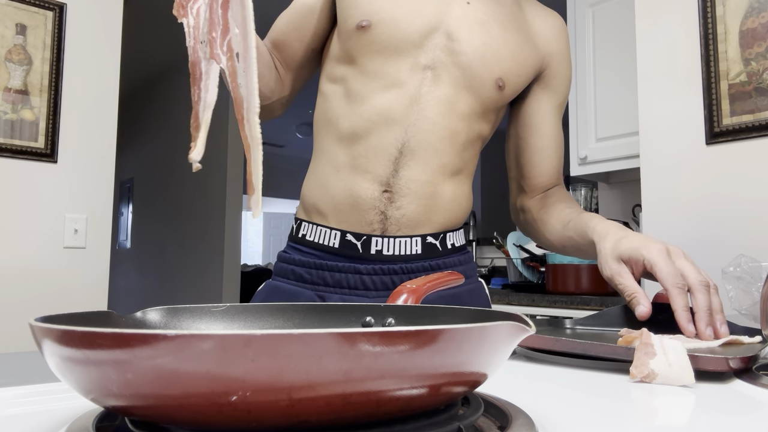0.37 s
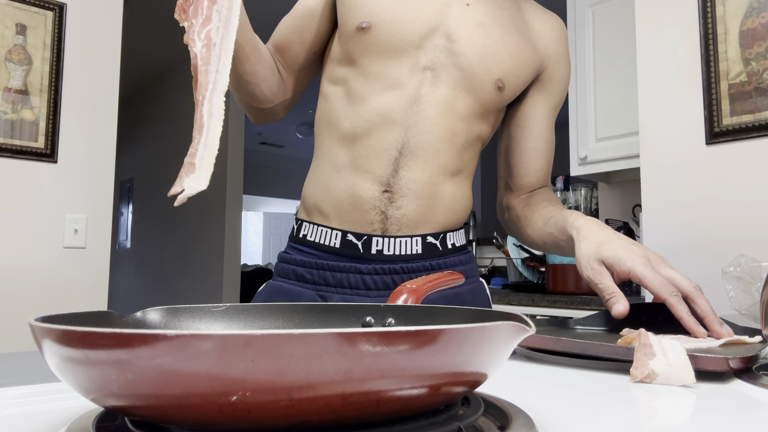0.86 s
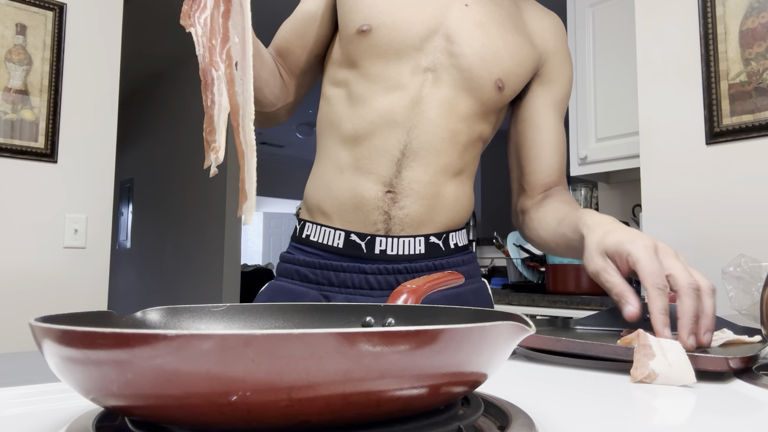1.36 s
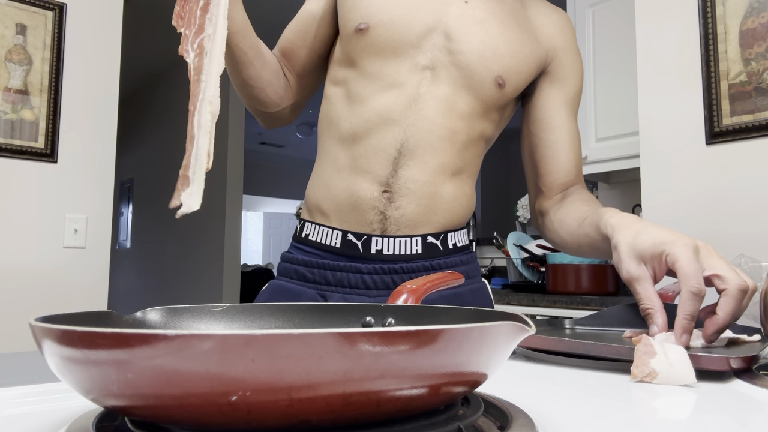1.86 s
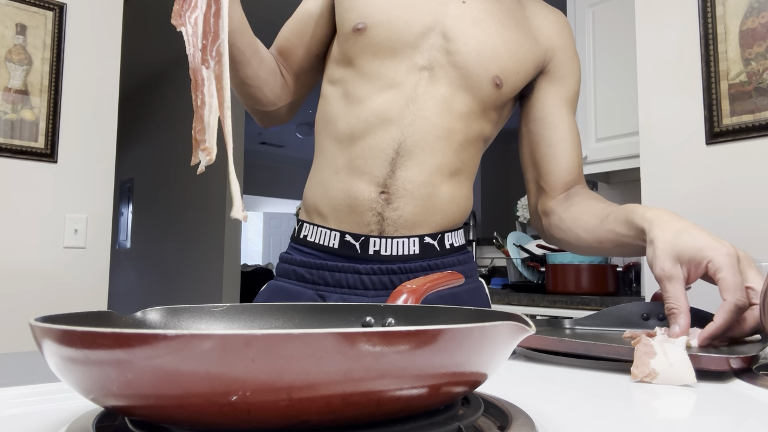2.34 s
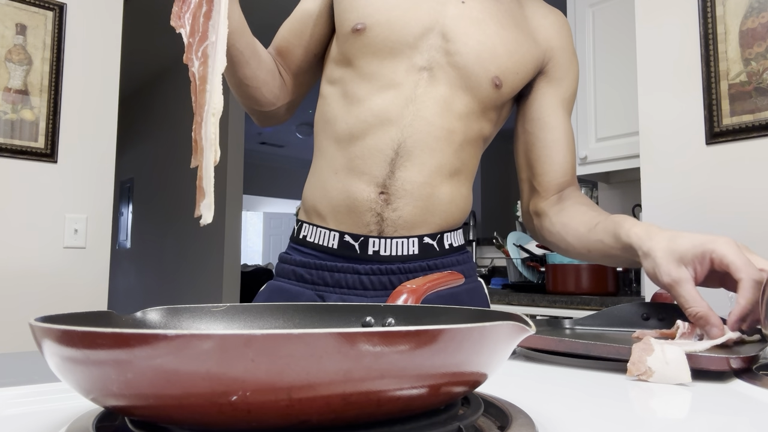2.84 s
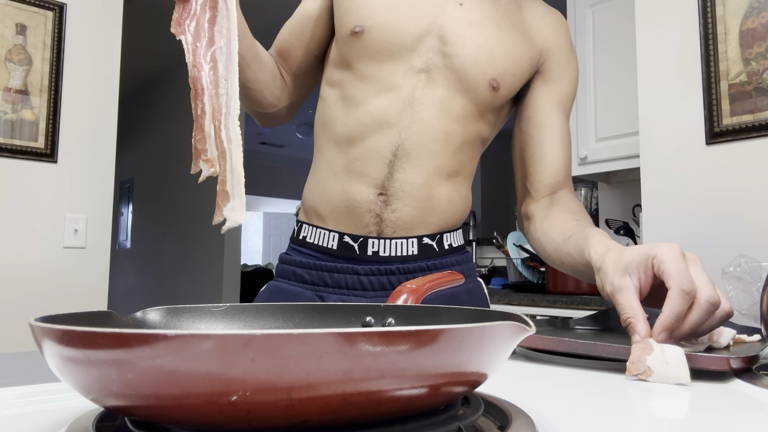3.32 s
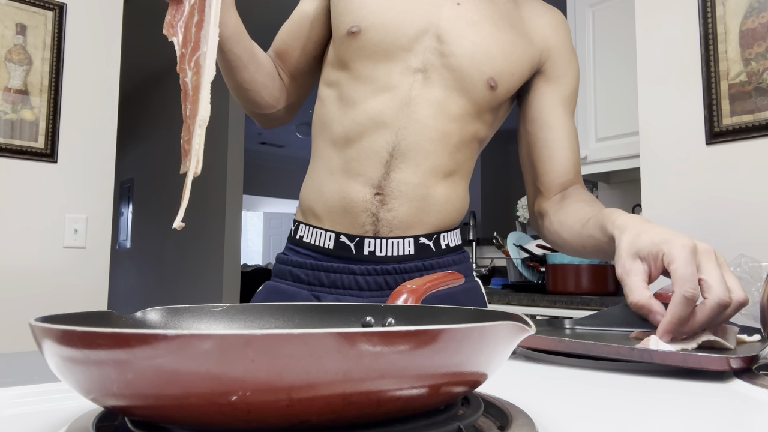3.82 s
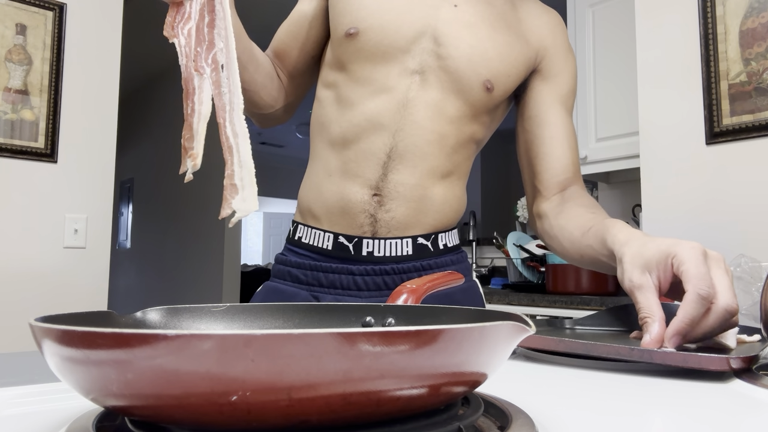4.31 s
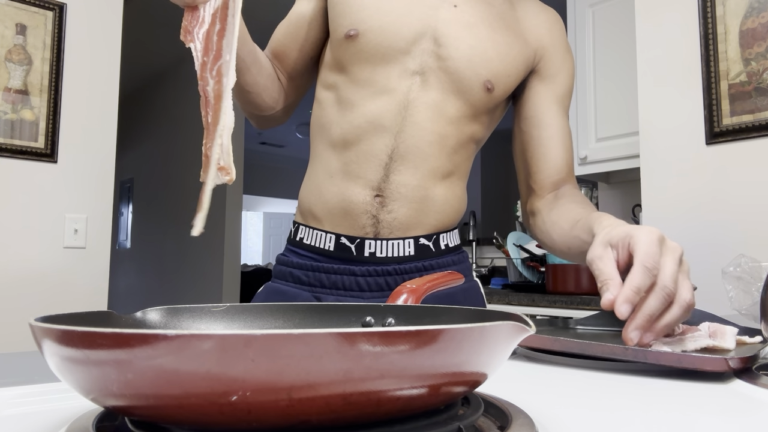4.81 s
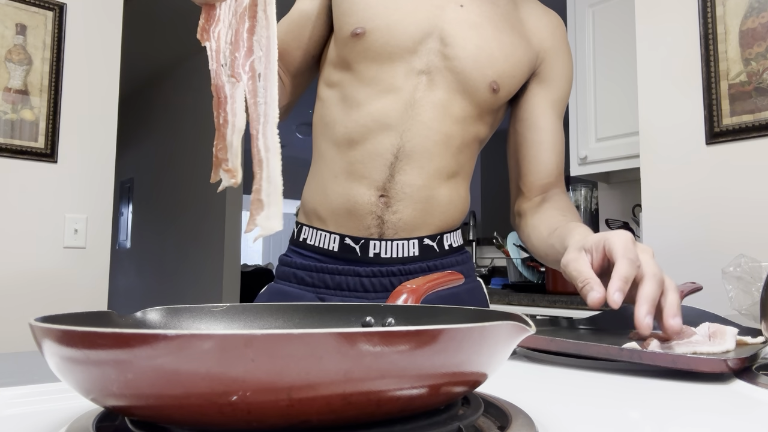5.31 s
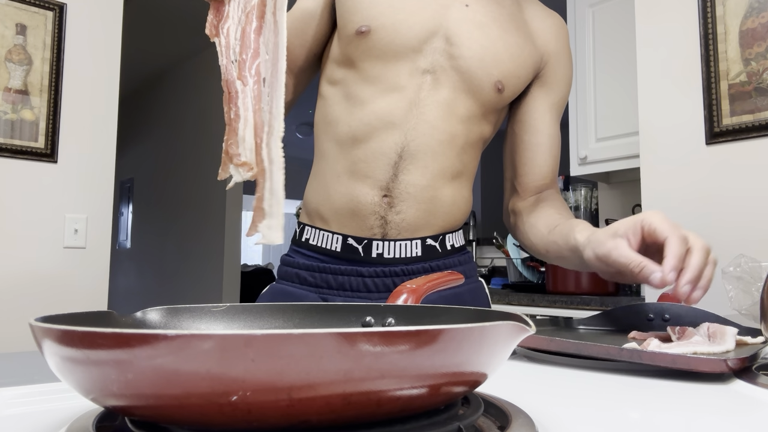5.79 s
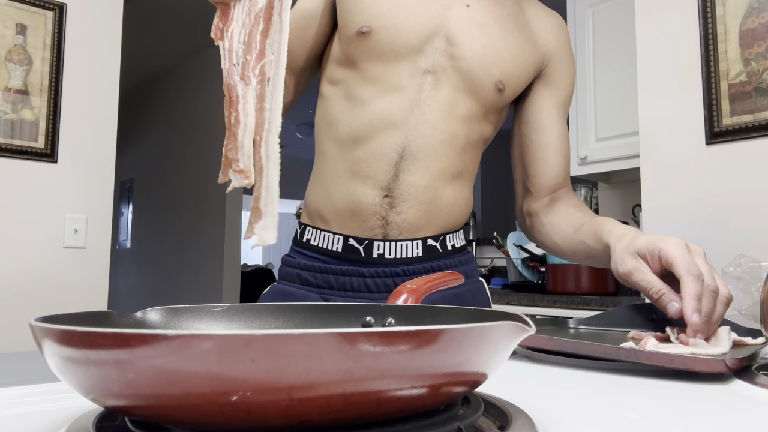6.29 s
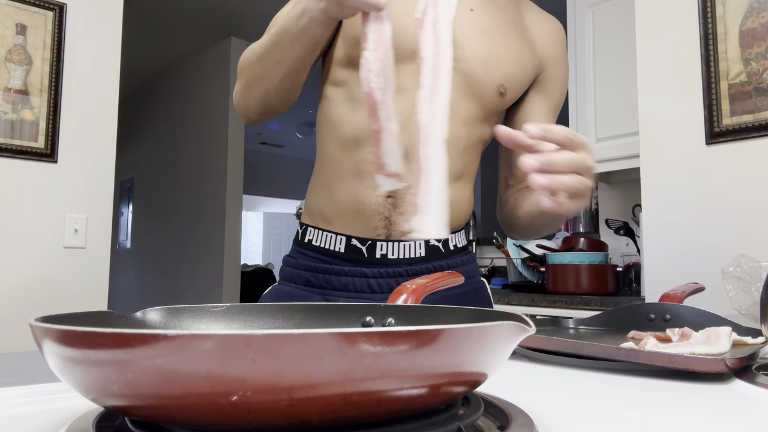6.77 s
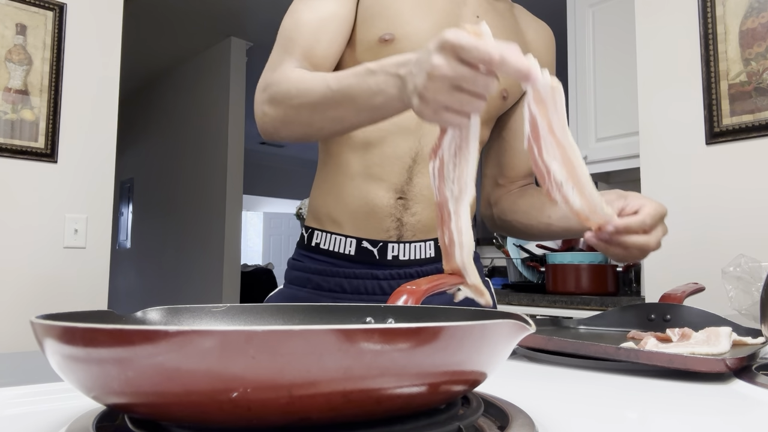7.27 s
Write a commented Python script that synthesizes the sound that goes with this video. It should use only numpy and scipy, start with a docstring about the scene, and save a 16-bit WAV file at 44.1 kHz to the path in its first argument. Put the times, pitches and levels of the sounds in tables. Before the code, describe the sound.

Throughout about 7.5 seconds, a home kitchen is filled by a steady low drone near 59 hertz, wavering motor tones above it, a broad fan roar coloured by the room and a duller, quiet hiss. During the first four seconds only three very faint ticks occur, around 0.2, 0.7 and 1.4, with tiny sticky peels of raw bacon near 1.7 and 3.15. At 4.1 the heating coil under the pan breaks into a dense run of small dry metallic ticks, about twenty per second. A loud snap rings through the pan at 5.0, close to a faint peel at 5.1; further snaps come at 5.4 and 5.95, with ticks between them. Ticking grows sparser after 6. A light fingertip tap on a tray falls at 6.25, soft peels follow at 6.3 and 6.6, and a last snap comes at 7.2. The microphone is close, in stereo, with brief room reflections.

```python
"""Kitchen with fan, stove coil and bacon

An extractor fan and a compressor fill the room: air rush is shaped noise, motor hum is wavering sines.
A stove coil heats under a pan: the metal creeps in runs of small ticks and lets go in louder snaps.
Each is a burst of noise, heard directly and through the ringing modes of coil and pan.
Fingers peel sticky bacon strips beside it as swells of grainy bright noise, with a tap on the tray."""
import sys
import numpy as np
from scipy import signal
from scipy.fft import rfft, irfft, next_fast_len
from scipy.io import wavfile
from scipy.ndimage import uniform_filter1d, map_coordinates

SR = 44100
rng = np.random.default_rng(int(sys.argv[2]) if len(sys.argv) > 2 else 0)


def generate_wav(signal):
    """Clip the signal to [-1, 1] and save it as 16-bit WAV at the path in sys.argv[1]."""
    frames = np.transpose(np.atleast_2d(signal))
    scaled = np.clip(frames, -1, 1) * 32767
    pcm = np.round(scaled).astype(np.int16)
    wavfile.write(sys.argv[1], SR, pcm)


def rack_gain(trim_db):
    """Turn a fader trim in dB into the linear factor to multiply a signal by."""
    fader = np.asarray(trim_db, float)
    return 10 ** (fader / 20)


N = 336924  # length [samples]
HALVES = np.array([[0.5], [-0.5]])  # splits a left-right difference between the two channels


def unit(x):
    """Scaled to rms 1."""
    return x / np.sqrt(np.mean(x ** 2) + 1e-20)


def along(points, hz):
    """Each column after the first, read at hz on a log axis."""
    f, *columns = np.transpose(points)
    return [np.interp(np.log(hz + 1), np.log(f + 1), column) for column in columns]


def wobble(rate):
    """A smooth random curve, rate knots a second."""
    knots = rng.standard_normal(int(N * rate / SR) + 4)
    return map_coordinates(knots, [np.arange(N) * rate / SR])


def filtered(x, response):
    """x times a complex response of frequency."""
    n = x.shape[-1]
    m = next_fast_len(n + 8192)
    return irfft(rfft(x, m) * response(np.fft.rfftfreq(m, 1 / SR)), m)[..., :n]


# Standing waves at the microphone lift or cancel the air noise:
# (centre [Hz], width [Hz], mid lift [dB], side lift [dB])
STANDING_WAVES = [(180, 10, 4.5, 7), (488, 10.3, 7.5, 3), (532, 8.7, -5.5, -3), (644, 12, -0.5, -5.5),
                  (673.4, 14, 5.5, -0.5), (700, 13, -0.5, -2), (788, 3.6, 0.5, -1), (842, 11, -8.5, -3),
                  (944, 18, 4, 0.5), (1050, 20, 4, -2), (1656, 50, 3.5, -1)]


def standing(hz, ripple_db):
    """Gains of mid and side: the strong low modes, and a dense uneven ripple of higher ones."""
    centre, width, *lift_db = np.transpose(STANDING_WAVES)
    bumps = np.exp(-((hz[:, None] - centre) / width) ** 2)
    ripple = [map_coordinates(rng.standard_normal(800), [hz / 35]) for _ in lift_db]
    ripple_share = np.clip(hz / 1000 - 0.5, 0, 1)  # none below 500 Hz, full from 1500 Hz
    return rack_gain(np.array(lift_db) @ bumps.T + ripple_db * np.array(ripple) * ripple_share)


def air(table, inside, patchy_db):
    """Stereo noise: the side signal is partly the mid signal turned in phase, partly its own."""
    z = signal.stft(rng.standard_normal((2, N)), nperseg=512)[2]
    # smoothed random patches in frequency and time make the noise uneven
    patches = uniform_filter1d(rng.standard_normal(z.shape[1:]), 6, axis=0)
    patches = uniform_filter1d(patches, 12, axis=1)
    noise = signal.istft(z * rack_gain(patchy_db * unit(patches)), nperseg=512)[1][:, :N]
    a, b = np.sqrt(SR / 2) * unit(noise)  # 0 dB per Hz

    def paths(hz):
        mid_db, side_db, in_step, quarter_turn = along(table, hz)
        own = np.sqrt(np.clip(1 - in_step ** 2 - quarter_turn ** 2, 0, 1))
        side = rack_gain(side_db)
        gains = np.array([rack_gain(mid_db), side * (in_step + 1j * quarter_turn), side * own])
        return inside(hz) * standing(hz, ripple_db=2.0)[[0, 1, 1]] * gains

    mid, linked, own = filtered(np.array([a, a, b]), paths)
    return np.array([mid + linked + own, mid - linked - own])


# Basic colour of the low roar and of the hiss above it, before standing waves and the trims in fan():
# (frequency [Hz], mid level [dB per Hz], side level [dB per Hz],
#  part of side in step with mid [-1 to 1], part a quarter turn ahead [-1 to 1])
ROAR_SPECTRUM = [(30, -85, -94, 0.0, -0.1), (45, -74.5, -86.5, -0.3, 0.2), (75, -69.5, -77, -0.4, -0.4),
                 (114.5, -63.5, -73.5, -0.6, -0.1), (122, -67.5, -70.5, -0.6, -0.2),
                 (178, -68.5, -82.5, -0.2, -0.3), (207, -67.5, -68.5, -0.3, -0.5),
                 (253, -57, -67, -0.6, -0.1), (282, -62, -65, -0.2, -0.9), (348, -65.5, -67, -0.5, -0.5),
                 (370, -71, -86, -0.0, -0.3), (475, -71.5, -66.5, -0.29, -0.5),
                 (563, -70.5, -62.5, -0.2, -0.4), (573, -67.5, -62, -0.86, -0.4),
                 (623, -77, -70.5, -0.6, -0.0), (704, -78, -73, -0.4, -0.5),
                 (790, -74.5, -67.5, -0.5, -0.0), (864, -78.5, -77, -0.63, -0.2),
                 (899, -75.5, -80.5, -0.2, -0.5), (1047, -89.5, -78, -0.2, -0.2)]
HISS_SPECTRUM = [(1300, -85, -89.5, -.3, .1), (1650, -89, -79.5, -.15, .4), (1930, -85.5, -87.5, -.1, .3),
                 (2600, -89, -90.5, -0.72, -.2), (3020, -90.5, -90.5, -0.78, 0),
                 (3340, -94, -94.5, -0.66, 0), (3970, -101, -101, -0.11, 0), (6270, -109, -110, -0.3, 0),
                 (9300, -117, -121, 0.094, -.5), (10250, -125, -135, 0.089, 0), (12500, -133, -137, 0, 0),
                 (15500, -140, -140, 0, 0)]


def fan():
    """Turbulent air: a low roar coloured by the room and a duller hiss above it."""
    roar = air(ROAR_SPECTRUM, lambda hz: 1 / (1 + (hz / 1150) ** 12), patchy_db=1.03)
    hiss = air(HISS_SPECTRUM, lambda hz: 1 / (1 + (1000 / (hz + 1)) ** 12), patchy_db=0.71)
    return rack_gain(0.5) * roar + rack_gain(-1.5) * hiss


# Slower shafts beat against the lowest motor tone:
# (time per beat [s], time when in step [s], rms level [dB], left-right [dB], left leads [radians])
SHAFT_BEATS = [(4.83, 4.09, -46, 2.5, 0.1), (0.3746, 3.905, -58.7, -3, -0.5)]
# Motor, blade and mains tones, all 1.52 dB stronger once played:
# (frequency [Hz], left rms level [dB], right rms level [dB], right leads [radians])
MOTOR_TONES = [(110.4, -54, -51, -0.2), (141.0, -40, -38, 0.1), (229.0, -52, -51, -0.4),
               (240.0, -47, -42, -0.6), (282.1, -48, -49, 1.2), (296.0, -55, -52, 1.2),
               (359.5, -52, -51, 0.6), (422.9, -64, -55, -1.8), (479.2, -65, -59, 3.0),
               (507.6, -58, -51, 1.6), (535.8, -45, -45, -3.1), (599.4, -58, -54, 2.4),
               (655.8, -63, -57, -2.9), (719.7, -64, -60, 2.7), (839.9, -68, -68, -2.8)]


def motors():
    """Turning machines hum as sines that waver in phase; the tones above the drone swell too, high ones more."""
    drone_hz, drone_db, drone_pan_db, drone_lead = 59.075, -38.3, -0.4, 0.32  # left-right dB; left leads, radians
    t = np.arange(N) / SR
    drone_phase = 2 * np.pi * drone_hz * t + 0.03 * wobble(1.7)
    drone_level = np.sqrt(2) * rack_gain(drone_db + drone_pan_db * HALVES)
    out = drone_level * np.sin(drone_phase + drone_lead * HALVES)
    for beat_s, step_s, db, pan_db, lead in SHAFT_BEATS:
        phase = drone_phase - 2 * np.pi * (t - step_s) / beat_s
        out += np.sqrt(2) * rack_gain(db + pan_db * HALVES) * np.sin(phase + lead * HALVES)
    for hz, left_db, right_db, lead in MOTOR_TONES:
        phase = 2 * np.pi * hz * t + 0.0012 * hz * wobble(2)
        swell = unit(rack_gain(0.0059 * hz * wobble(3.02)))
        level = np.sqrt(2) * rack_gain(1.52) * rack_gain([[left_db], [right_db]])
        out += level * swell * np.sin([phase, phase + lead])
    return out


# How long the kitchen rings after a hit: (frequency [Hz], time to fall 60 dB [s])
KITCHEN_DECAY = [(500, 0.48), (3000, 0.18), (7000, 0.27), (12000, 0.24)]


def kitchen(x):
    """A fresh stereo tail for one hit; each frequency dies at its own speed."""
    hz, t, z = signal.stft(rng.standard_normal((2, SR // 3)), SR, nperseg=256)
    decay_s = along(KITCHEN_DECAY, hz)[0][:, None]
    tail = signal.istft(z * rack_gain(-60 * t / decay_s), SR, nperseg=256)[1]
    delayed = np.pad(x, ((0, 0), (300, 0)))  # the tail starts 300 samples late
    return signal.fftconvolve(delayed, tail / np.linalg.norm(tail[0]), axes=1)


def add(out, s, hit, room_db, ring=0):
    """A hit and its ring at time s; the room answers mostly the broad hit, as the ring is faint far from the pan."""
    start = round(s * SR)
    wet = rack_gain(room_db) * kitchen(hit + 0.31 * ring)
    out[:, start:start + hit.shape[1]] += hit + ring
    out[:, start:start + wet.shape[1]] += wet


# Ringing modes of coil and pan: (frequency [Hz], width [Hz], relative level [dB], left-right [dB])
PAN_MODES = [(1440, 37, -11.5, -16), (1634, 75, -4.5, -5), (2380, 55, -2, -2.5), (2860, 22, -2, -4),
             (2900, 69, -3.5, -2.5), (3370, 150, -4, -3.5), (3720, 84, -10, -1.5), (4070, 45, 0, 4.5),
             (4254, 47, -0.5, -13), (4700, 60, -9.5, -7), (5120, 110, -11, -13.5), (5790, 66, -5, -8.5),
             (6420, 22, -14, 3), (6720, 32, -2, 1), (8060, 24, -3, 15), (9410, 54, -5.5, 0),
             (9400, 50, -8.5, 11.5), (9300, 60, -9, 2), (10120, 61, 2, 2), (11400, 120, -15, 1),
             (13000, 50, -4, 9.5), (13600, 45, -5, 2.5), (15100, 80, -13.5, -3)]
# Broad rattle of a slip: (frequency [Hz], relative level [dB per Hz])
RATTLE_SPECTRUM = [(300, -88), (700, -29), (1300, -3), (3000, -4.5), (6000, -2), (10000, -8.5),
                   (11000, -20.5), (15500, -23), (16500, -60)]


def slip(db, tilt_db, scatter_db, direct_db, top_hz=16000, focus_hz=3000, focus_db=0, body_db=0):
    """A short rattle of contacts: heard directly, and through the modes of coil and pan."""
    t = np.arange(SR // 6) / SR
    hz, width, level_db, pan_db = np.transpose(PAN_MODES)[:, :, None]
    level_db = level_db + scatter_db * rng.standard_normal(hz.shape)
    size = rack_gain(level_db + pan_db * HALVES[:, :, None])

    def metal(f):
        resonances = 1j * f * width / (hz * hz - f * f + 1j * f * width)
        modes = np.sum(size * resonances, axis=1)
        modes = modes * rack_gain(focus_db * np.exp(-(np.log((f + 1) / focus_hz) / 0.08) ** 2))
        direct = rack_gain(along(RATTLE_SPECTRUM, f)[0] + direct_db + np.array([[-1.2], [1.2]]))
        colour_db = tilt_db * np.log2(np.maximum(f, 1200) / 6000)
        colour_db = colour_db + body_db / (1 + (f / 2400) ** 6)
        dulling = 0.24 + 0.64 / (1 + (f / top_hz) ** 16)
        return np.array([direct, modes]) * rack_gain(colour_db) * dulling

    envelope = rack_gain(-60 * (t / 0.049) ** 1.44) * (1 - np.exp(-t / 0.0003))  # down 60 dB at 49 ms
    contacts = envelope * rng.standard_normal((2, len(t)))
    return rack_gain(db + 8.5) * filtered(contacts, metal)


# Small slips of the coil under the pan, about twenty a second while a run lasts:
# (time [s], nominal peak level [dB])
COIL_SLIPS = [(0.1905, -55), (0.6592, -58), (1.3726, -54.5), (4.128, -44.5), (4.18, -47), (4.234, -47),
              (4.2833, -46), (4.335, -47), (4.3984, -47), (4.443, -48), (4.4878, -48.5), (4.527, -49.5),
              (4.555, -47.5), (4.601, -48), (4.6458, -48), (4.7032, -47.5), (4.7565, -48), (4.801, -48),
              (4.8439, -46), (4.8883, -47), (4.935, -47.5), (5.0599, -49), (5.2206, -46), (5.2725, -49),
              (5.325, -49), (5.3732, -53), (5.5184, -52), (5.5677, -50.5), (5.6146, -50), (5.663, -50.5),
              (5.713, -52), (5.7683, -53.5), (5.8167, -49.5), (5.866, -48), (5.9122, -52.5),
              (6.0222, -45.5), (6.123, -53.5), (6.3786, -49.5), (6.4368, -53.5), (6.4827, -55),
              (6.5854, -52.5), (6.785, -47), (7.2834, -49.5), (7.5176, -58)]
# The coil lets go: (time [s], nominal peak level [dB], tilt [dB per octave],
#  frequency above which it is dull [Hz], frequency where the pan answers most [Hz])
COIL_SNAPS = [(4.977, -29.5, -2, 7340, 2600), (5.4394, -32, 1, 14000, 2860),
              (5.9545, -35.5, 1, 14000, 3180), (7.237, -35.5, 1.5, 14000, 3370)]


def coil():
    """Runs of small slips; a snap is broader, shakes the body of the pan, and a weak slip leads it."""
    full_tilt_db, full_slip_db = -1.5, -47.5  # dB per octave of a full slip; its level
    duller = 0.5  # tilt lost per dB below a full slip
    out = np.zeros((2, N + SR))
    for s, db in COIL_SLIPS:
        tilt_db = full_tilt_db + duller * (db - full_slip_db) + 1.0 * rng.standard_normal()
        rattle, ring = slip(db, tilt_db, scatter_db=2.0, direct_db=-9.0)
        add(out, s, rattle, room_db=-3.5, ring=ring)
    for s, db, tilt_db, top_hz, focus_hz in COIL_SNAPS:
        # the weak slip 5 ms ahead
        rattle, ring = slip(db - 17, 0, scatter_db=1.5, direct_db=-8)
        add(out, s - 0.005, rattle, room_db=0.0, ring=ring)
        rattle, ring = slip(db, tilt_db, scatter_db=1.3, direct_db=-3, top_hz=top_hz,
                            focus_hz=focus_hz, focus_db=13, body_db=4.5)
        add(out, s, rattle, room_db=-5.5, ring=ring)
    return out[:, :N]


# Sticky peeling, one pull a row:
# (time of the strongest pull [s], level there [dB], rising time [s], fading time [s])
PEEL_PULLS = [(1.69, -74, .05, .05), (3.15, -79, 0.14, .15), (5.1, -71, .06, 0.19), (6.3, -82, 0.16, .15),
              (6.62, -74, .12, 0.22)]
# A fingertip smacks the tray: (time [s], nominal peak level [dB], left-right [dB])
TRAY_TAPS = [(6.2519, -38, 2.5)]


def fingers():
    """Fat parts from fat as fine bright grains; a tap is a short click with a knock of the tray."""
    def peel_band(hz):
        return 1 / (1 + (6000 / (hz + 1)) ** 4) / (1 + (hz / 10500) ** 12)

    def click_band(hz):
        return 1 / (1 + (4000 / (hz + 1)) ** 3) / (1 + (hz / 7500) ** 16)

    out = np.zeros((2, N + SR))
    now = np.arange(N) / SR
    pull = np.zeros(N)
    for s, db, rise, fade in PEEL_PULLS:
        away = np.maximum((s - now) / rise, (now - s) / fade)
        pull += rack_gain(db - 15 * away)  # 15 dB per rising or fading time
    grains = rng.standard_normal((2, N)) * rack_gain(3 * wobble(150))
    out[:, :N] = pull * unit(filtered(grains, peel_band))

    t = np.arange(SR // 20) / SR
    for s, db, pan_db in TRAY_TAPS:
        click = unit(filtered(rng.standard_normal((2, len(t))), click_band))
        knock = 2.2 * np.sin(2 * np.pi * 2500 * t + np.array([[0], [1.6]]))
        envelope = rack_gain(db + pan_db * HALVES - 60 * t / 0.011) * (1 - np.exp(-t / 0.0003))
        add(out, s, envelope * (click + knock), room_db=-4.5)
    return out[:, :N]


def scene():
    """All sources add up as sound pressure at the microphone."""
    return fan() + motors() + coil() + fingers()


# In the treble the two channels share one signal: # (frequency [Hz], shared part [0-1], right leads [radians])
TREBLE_SHARING = [(6200, 0, 4), (7900, 0.45, 2.5), (9360, 0.94, 1.5), (10000, 1, -1), (12000, 1, 1.5),
                  (13200, 0.95, -2), (14300, 0.84, -3)]


def share_treble(dry):
    """In the treble both channels carry more and more of the right signal, turned in phase between them."""
    def share(hz):
        part, lead = along(TREBLE_SHARING, hz)
        return np.sqrt(np.clip(part, 0, 1)) * np.exp(0.5j * lead * np.array([[-1], [1]]))

    apart = filtered(dry, lambda hz: np.sqrt(1 - np.abs(share(hz)) ** 2 + 1e-9))
    shared = filtered(dry[[1, 1]], share)
    return apart + shared


def band_limit(x):
    """A steep low-pass at the top of the band."""
    return signal.sosfilt(signal.butter(12, 14620, fs=SR, output="sos"), x)


def record(dry):
    """The finished scene: its treble is shared between the channels, then cut off at the top of the band."""
    mix = share_treble(dry)
    return band_limit(mix)


dry = scene()
out = record(dry)
generate_wav(out)
```